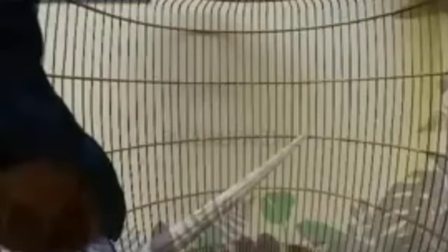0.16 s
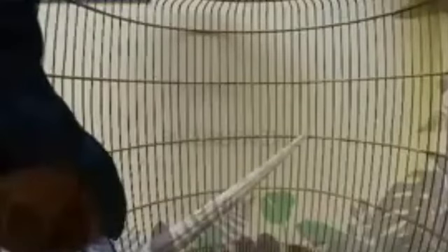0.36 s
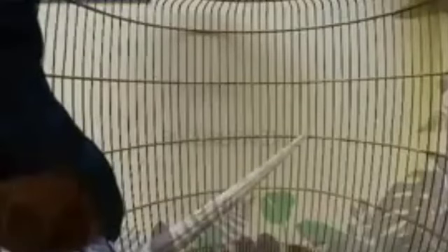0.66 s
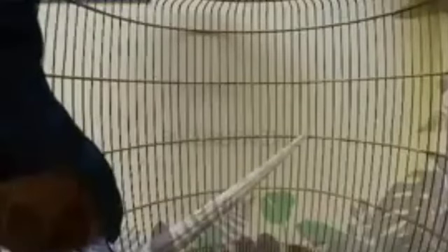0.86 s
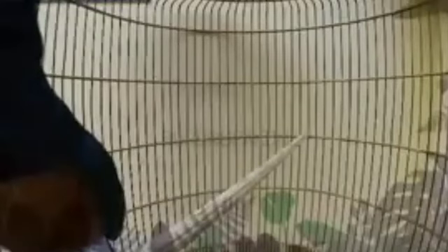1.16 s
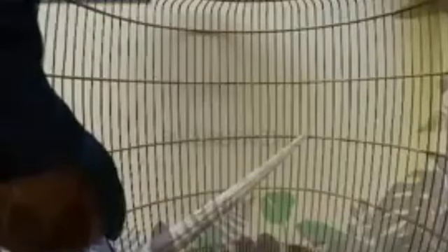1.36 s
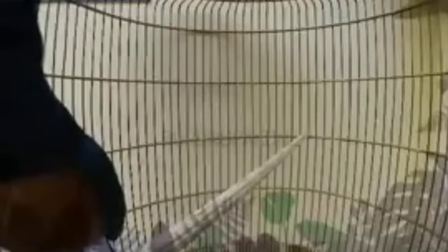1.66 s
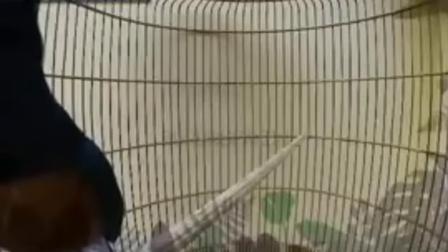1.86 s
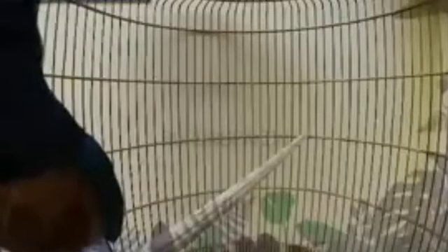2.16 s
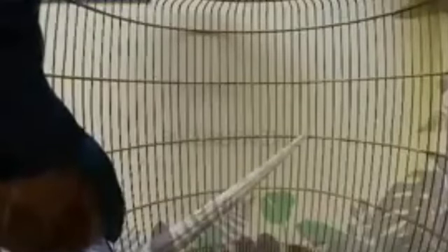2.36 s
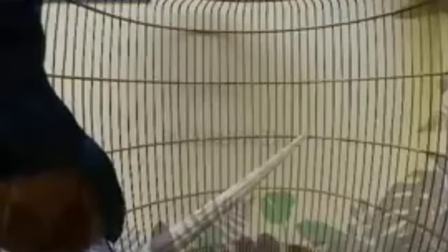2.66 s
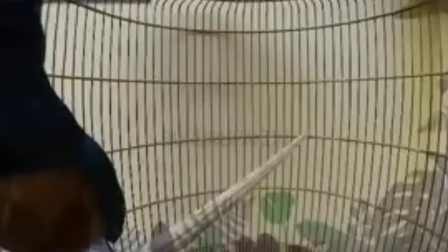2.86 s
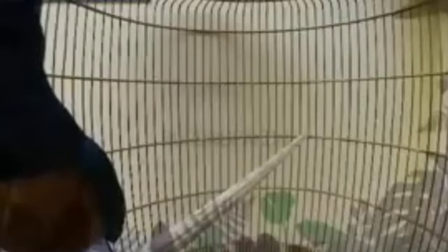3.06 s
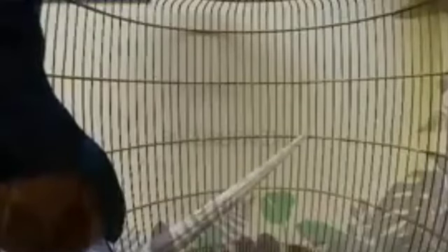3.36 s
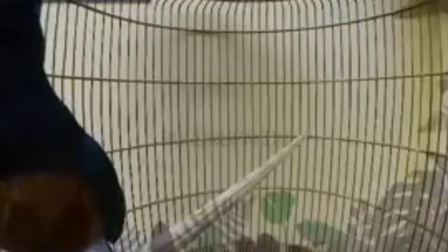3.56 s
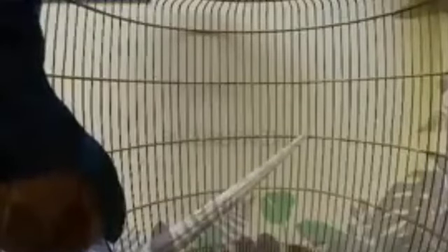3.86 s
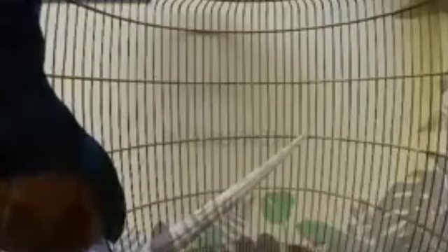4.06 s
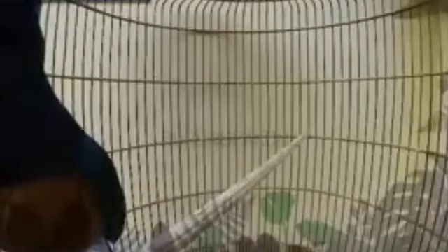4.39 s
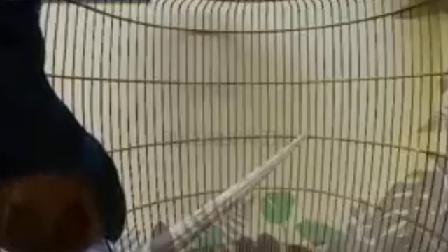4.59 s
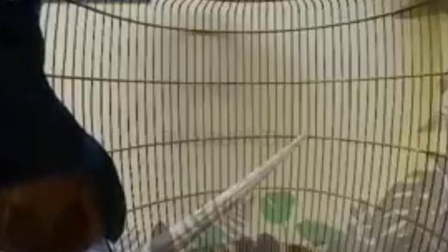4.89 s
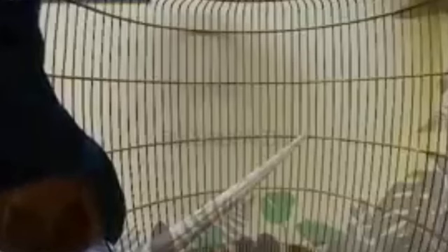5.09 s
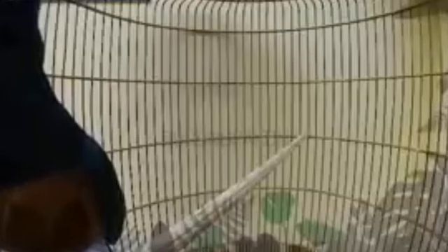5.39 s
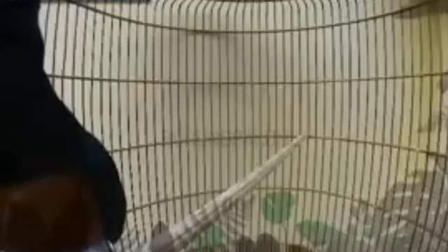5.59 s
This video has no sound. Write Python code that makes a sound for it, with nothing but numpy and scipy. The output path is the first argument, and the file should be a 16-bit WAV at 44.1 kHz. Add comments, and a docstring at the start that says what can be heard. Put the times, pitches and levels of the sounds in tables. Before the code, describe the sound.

A caged songbird sings loudly, close to the microphone, with short room reflections and slight overload on the strongest notes. At about 0.2 s comes a harsh, noisy churr of quick puffs, and at 0.45 s a much weaker one. From 0.7 to 1.2 s a piercing whistle falls rapidly from high pitch, settles, and breaks into a throbbing, raspy flutter, with a lower second voice colouring it. A similar whistle runs from 1.85 to 2.35 s. A quiet gap holds faint insects, hiss and a soft distant whistle near 2.6-3.1 s. Then eight sharp, plunging chips strike at about 3.2, 3.5, 3.85, 4.25, 4.5, 4.9, 5.3 and 5.65 s. All but the one at 4.25 are followed by a smooth, nearly pure whistle sweeping upward and drooping slightly at its end; the last is strongest. Tiny low pips surround some chips, and far birds churr and call faintly.

```python
"""Two harsh churrs, two long falling two-voiced whistles that break into a throb, then eight sharp chips,
most followed by a rising whistle: a caged songbird close to the microphone. Other birds and insects are faint.
Churrs are puffs of filtered noise; whistles and chips are gliding sines with weak partials, and the
coupled voices add sum and difference tones. A short room follows; the loudest notes overload the recorder."""
import sys
import numpy as np
from scipy import signal
from scipy.io import wavfile
from scipy.ndimage import uniform_filter1d

SR = 44100
rng = np.random.default_rng(int(sys.argv[2]) if len(sys.argv) > 2 else 0)


def bounce(signal):
    """Save signal as a 16-bit WAV file at the path given by the first command-line argument."""
    frames = np.transpose(np.atleast_2d(signal))
    limited = np.clip(frames, -1, 1)
    pcm = np.round(limited * 32767).astype(np.int16)
    wavfile.write(sys.argv[1], SR, pcm)


N = 252693
TIME = np.arange(N) / SR

# spectrum of the churring throat, near and far: freq_hz, relative density_db (per Hz)
CHURR_SPECTRUM = [(470, -68), (800, -45.5), (1310, -22.5), (1640, -10.5), (3290, -7.5), (4370, -12),
                  (5470, 0), (10000, -35), (14400, -34), (15500, -36.5)]
# long whistles: start_s, end_s, opening_hz, settled_hz (before the throb lifts it), slow_fall_hz,
# slow_fall_ms (time constant), slip_s, first_throb_s, throb_gap_ms, gap_growth_ms (times throb number squared)
LONG_WHISTLES = [(.701, 1.217, 5780, 4125, 1060, 57, .957, .8632, 18.0, .06),
                 (1.851, 2.352, 5460, 4085, 450, 145, 1.974, 1.979, 19.0, .075)]


def amp(db):
    """Decibels to amplitude: 20 dB is a factor of ten."""
    return 10 ** (np.asarray(db) / 20)


def rms_one(x):
    """Normalise the root mean square to 1."""
    return x / np.sqrt(np.mean(x ** 2) + 1e-20)


def phase(hz):
    """Phase is the running integral of frequency."""
    return 2 * np.pi * np.cumsum(hz) / SR


def wander(rate_hz):
    """Random modulation: white noise low-passed at rate_hz, with spread 1."""
    low_pass = signal.butter(2, rate_hz, fs=SR, output="sos")
    return rms_one(signal.sosfilt(low_pass, rng.standard_normal(N)))


def coloured(x, spectrum):
    """Linear filtering: a short minimum-phase response of unit energy gives noise its spectrum."""
    hz, db = np.transpose(spectrum)
    grid = np.linspace(0, SR / 2, 513)
    # doubled decibels, because the minimum-phase design takes the square root of the gain
    gains = amp(2 * np.interp(np.log(grid + 1), np.log(hz), db))
    taps = signal.minimum_phase(signal.firwin2(511, grid, gains + 1e-7, fs=SR))
    return signal.fftconvolve(x, rms_one(taps) / np.sqrt(len(taps)))[:N]


def played(notes, edge_s=.003):
    """Interpolate the columns of all notes over time, with a gate that opens softly inside each note."""
    s, *columns = np.transpose(np.vstack(notes))
    gate = sum(np.clip(np.minimum(TIME - note[0][0], note[-1][0] - TIME) / edge_s, 0, 1) for note in notes)
    return [np.interp(TIME, s, column) for column in columns] + [gate]


def glides(table, octave_db, twelfth_db, waver_db):
    """Linear frequency glides: soft-edged three-partial tones whose level wavers."""
    out = np.zeros(N)
    for start, end, from_hz, to_hz, db in table:
        at = slice(round(start * SR), round(end * SR))
        turn = phase(np.linspace(from_hz, to_hz, at.stop - at.start))
        tone = np.sin(turn) + amp(octave_db) * np.sin(2 * turn) + amp(twelfth_db) * np.sin(3 * turn)
        out[at] += amp(db) * np.sqrt(np.hanning(len(turn))) * tone
    return out * amp(waver_db * wander(60))


def garden():
    """Stationary noise: insect bands and outdoor hiss, filtered from white noise, with a drifting level."""
    # insects and hiss: freq_hz, relative density_db (per Hz)
    spectrum = [(410, -65), (700, -38), (1110, -32.5), (1300, -12), (1430, -20), (1570, -8), (1930, -13.5),
                (2600, -2.5), (3510, -17.5), (5770, -22), (6550, -0.5), (8940, -16), (11000, -19.5),
                (14300, -46), (22000, -120)]
    # mean level: time_s, level_db
    level = [(0, -64), (2.55, -66.5), (2.8, -60), (3.151, -67.5), (4.099, -65), (5.73, -63.5)]
    s, db = np.transpose(level)
    drifting_db = np.interp(TIME, s, db) + wander(1.8)
    return amp(drifting_db) * coloured(rng.standard_normal(N), spectrum)


def churrs():
    """Pulsed turbulence: puffs of air through the throat; later ones are weaker, longer and run together."""
    # churrs: first_puff_s, puff_gap_ms, first_puff_db (decay level before the rounded onset)
    churr_table = [(.1826, 6.6, 0.5), (0.4565, 7.7, -15)]
    second_db, loss_per_puff_db = 6, 5
    t60_ms, lengthens_ms = 12, 8       # decay of the first two puffs; each later one adds this
    envelope = np.zeros(N)
    for first, gap_ms, first_db in churr_table:
        for k in np.arange(8):
            late = np.maximum((TIME - first) * 1000 - k * gap_ms, 0)
            db = second_db - loss_per_puff_db * (k - 1) if k else first_db
            decay_db = 60 * late / (t60_ms + lengthens_ms * max(k - 1, 0))
            onset = (1 - np.exp(-late / 0.82)) ** 2
            envelope += amp(db - decay_db) * onset
    return coloured(envelope * rng.standard_normal(N), CHURR_SPECTRUM)


def room(x):
    """Reverberation: quick reflections off cage and wall, then a thin tail, both dulled."""
    near_t60_s, near_db = .05, -19.5   # levels before the treble cut
    tail_t60_s, tail_db = 0.37, -33
    t = TIME[:SR]
    near = amp(near_db) * rms_one(rng.standard_normal(SR) * amp(-60 * t / near_t60_s))
    tail = amp(tail_db) * rms_one(rng.standard_normal(SR) * amp(-60 * t / tail_t60_s))
    dull = signal.butter(2, 7500, fs=SR, output="sos")
    return signal.fftconvolve(x, signal.sosfilt(dull, near + tail) / np.sqrt(SR))[:N]


def lower_voice():
    """Frequency locking: it crests, sinks, locks to half the upper pitch, then frays upward into a rasp."""
    # lower voice: start_s, from_hz, crest_s, crest_hz, rest_hz, free_db (just before locking), lock_s,
    # locked_db, fray_s, frayed_hz (at the end), rasp_db, end_s
    lower_table = [(.68, 1977, 0.71, 2432, 1927, -32.5, .998, -29.5, 1.05, 2700, -43.5, 1.2),
                   (1.838, 2120, 1.863, 2395, 2072, -24, 1.995, -20, 2.09, 2950, -38, 2.27)]
    fall_ms, swell_ms, swelled_db, lock_ms, fray_ms = 60, 30, -22.5, 12, 110
    steady_hz, shaky_hz, frayed_scatter_hz = 8.2, 40, 232  # scatter: at first; added up to lock; added by fray
    notes = []
    for (start, from_hz, crest, crest_hz, rest_hz, free_db, lock,
         locked_db, fray, frayed_hz, rasp_db, end) in lower_table:
        s = np.arange(start, end, 1 / 1000)
        locked = np.clip((s - lock) * 1000 / lock_ms + 1, 0, 1)
        frayed = np.clip((s - fray) * 1000 / fray_ms, 0, 1)
        climb_hz = crest_hz - (crest_hz - from_hz) * ((crest - s) / (crest - start)) ** 2
        sink_hz = rest_hz + (crest_hz - rest_hz) * np.exp(-np.maximum(s - crest, 0) * 1000 / fall_ms)
        sink_hz += (frayed_hz - sink_hz) * np.maximum(s - fray, 0) / (end - fray)
        hz = np.where(s < crest, climb_hz, sink_hz)
        db = np.interp(s, [start, crest, crest + swell_ms / 1000, lock - lock_ms / 1000,
                           lock, fray, fray + fray_ms / 1000, end],
                       [-50, swelled_db - 9.5, swelled_db, free_db,
                        locked_db, locked_db - 7.5, rasp_db, -53])
        scatter_hz = steady_hz + shaky_hz * (1 - locked) * ((s - start) / (lock - start)) ** 3
        scatter_hz += frayed_scatter_hz * frayed ** 1.4
        notes.append(np.transpose([s, hz, db, scatter_hz, locked * (1 - frayed)]))
    return played(notes)


def upper_voice():
    """Exponential relaxation: the whistle swells as its pitch drops fast, then slowly; it ends in a flick down."""
    quick_fall_ms = 12
    slip_hz, slip_ms = 105, 7          # a downward slip shortly before the voices lock
    throb_lift_hz = 60.55              # between throbs the pitch rides this much higher
    lead_ms, swell_db, swell_ms = 14, 22, 21
    hold_db, hold_gain_db, hold_gain_ms = -4.2, 3.6, 300
    close_ms, close_db, close_hz = 10, 34, 500
    notes = []
    for start, end, open_hz, settled_hz, slow_hz, slow_ms, slip_s, first_throb, *_ in LONG_WHISTLES:
        s = np.arange(start - lead_ms / 1000, end + close_ms / 1000, 1 / 1000)
        late = np.maximum(s - start, 0) * 1000
        closing = np.maximum(s - end, 0) * 1000 / close_ms
        slip = slip_hz / (1 + np.exp((s - slip_s) * 1000 / slip_ms))
        quick_hz = open_hz - settled_hz - slow_hz - slip_hz
        hz = settled_hz + slip + slow_hz * np.exp(-late / slow_ms)
        hz += quick_hz * np.exp(-late / quick_fall_ms) - close_hz * closing
        hz += throb_lift_hz * np.clip((s - first_throb) * 100 + 1, 0, 1)
        db = hold_db + hold_gain_db * np.minimum(late / hold_gain_ms, 1) - swell_db * np.exp(-late / swell_ms)
        db -= 31 * np.maximum(start - s, 0) * 1000 / lead_ms + close_db * closing
        notes.append(np.transpose([s, hz, db]))
    return played(notes)


def throbs():
    """Joint amplitude and frequency modulation: a slowing beat of dips (dB) and sags (Hz), some deep."""
    # throbs where the air flow falters deeply: time_s, depth_db, width_ms (about half depth)
    falters = [(.9512, 11, 2.4), (.992, 10.5, 2.5), (1.011, 7, 1.9), (1.0506, 5.5, 4.8), (1.0879, 17, 6),
               (1.1087, 13, 5.5), (1.1268, 14.5, 4.9), (1.1471, 7, 7.2), (1.1653, 18, 5.5),
               (2.0953, 8.5, 4.5), (2.1304, 3, 9.5), (2.1531, 12.5, 5.7), (2.1767, 5.5, 4.8),
               (2.2419, 9, 5.4), (2.258, 7.5, 3.6), (2.2819, 14, 6.5), (2.3018, 19.5, 5.5),
               (2.3237, 15.5, 6.4), (2.346, 5, 20)]
    light_db, deepens_db_per_s, spread_db, light_ms, light_sag_hz = 2.5, 6.5, 0.58, 8.4, 90
    dips = [(*row, 0) for row in falters]
    beat = np.arange(19)
    for *_, first, gap_ms, growth_ms in LONG_WHISTLES:
        for s in first + (gap_ms * beat + growth_ms * beat ** 2) / 1000:
            depth_db = light_db + deepens_db_per_s * (s - first) + spread_db * rng.standard_normal()
            dips.append((s, depth_db, light_ms, light_sag_hz))
    dip_db, sag_hz = np.zeros(N), np.zeros(N)
    for s, depth_db, width_ms, base_hz in dips:
        at = slice(round((s - .05) * SR), round((s + .05) * SR))
        late = (TIME[at] - s) * 1000
        dip_db[at] += depth_db * np.exp(-(late / (0.65 * width_ms)) ** 2)
        sag_ms = np.where(late < 0, 11.0, 3.0)     # slow fall, quick return
        sag_hz[at] += (base_hz + 4 * depth_db) * np.exp(-(late / sag_ms) ** 2)
    return dip_db, sag_hz


def long_whistles():
    """Coupled oscillators: two voices make sum and difference tones; a falter drops level and pitch together."""
    # tones of the coupled voices: upper_multiple, lower_multiple, level_db (over the lower voice, at full flow)
    coupled_tones = [(0, 1, 2.5), (0, 2, 1.5), (0, 3, -4.5), (1, -1, -.5), (1, 1, -4), (2, 1, -20)]
    throat_floor_hz = 1770             # the tones below the upper voice are silent under this difference
    upper_hz, upper_db, upper_on = upper_voice()
    lower_hz, lower_db, scatter_hz, lock, lower_on = lower_voice()
    falter_db, sag_hz = throbs()
    upper_hz = upper_hz - sag_hz + 9 * wander(250)
    upper = phase(upper_hz)
    lower = phase(lock * upper_hz / 2 + (1 - lock) * lower_hz + np.abs(scatter_hz) * wander(180))
    flow = np.sqrt(2) * amp(upper_db - falter_db + .5 * wander(210)) * upper_on
    out = flow * (np.sin(upper) + amp(-28.5) * np.cos(2 * upper))
    for up, low, db in coupled_tones:
        tone = np.sqrt(2) * amp(lower_db + db) * lower_on * np.sin(up * upper + low * lower)
        if up:
            tone *= np.minimum(flow, 1) ** 2       # coupling needs the upper voice
        if low < 0:
            tone *= np.clip((upper_hz - lower_hz - throat_floor_hz) / 350, 0, 1)
        # once locked, the other tones merge with those of multiple 1
        out += tone if low == 1 else (1 - lock) * tone
    return out


def far_birds():
    """Narrow and wide bands at low level: distant noise churrs, a wavering two-partial whistle, single notes."""
    # churrs of a far bird: start_s, end_s, level_db, fade_db (lost by the end)
    far_churrs = [(1.357, 1.555, -53.5, 12.5), (4.07, 4.224, -57, -0.5), (4.758, 4.861, -50.5, 4),
                  (5.219, 5.245, -48.5, 5.5)]
    # far whistler: time_s, pitch_hz, level_db, octave_db
    far_whistle = [(2.62, 1840, -62, -64), (2.66, 2113, -75, -54), (2.7, 2205, -62, -51),
                   (2.87, 2220, -58.5, -58), (2.95, 2182, -55.5, -67.5), (3.06, 2066, -60.5, -73),
                   (3.13, 2033, -72, -80)]
    # far single notes: start_s, end_s, from_hz, to_hz, level_db
    far_notes = [(2.25, 2.45, 1600, 1690, -63), (2.36, 2.51, 1350, 1346, -65.5),
                 (3.9, 4.5, 1905, 1880, -73), (4.8, 4.92, 2150, 2056, -59.5),
                 (4.95, 5.27, 1958, 1727, -59.5), (5.03, 5.27, 1400, 1467, -69)]
    db, on = played([[(start, db), (end, db - fade_db)] for start, end, db, fade_db in far_churrs])
    out = coloured(on * amp(db) * rng.standard_normal(N), CHURR_SPECTRUM)
    hz, db, octave_db, on = played([far_whistle])
    turn = phase(hz + 12 * wander(56.4))
    fundamental = amp(db + 3.8 * wander(52)) * np.sin(turn)
    octave = amp(octave_db + 3.8 * wander(67)) * np.sin(2 * turn)
    out += on * np.sqrt(2) * (fundamental + octave)
    return out + glides(far_notes, octave_db=-28.5, twelfth_db=-40.0, waver_db=3.5)


def chips():
    """Falling tone with a resonant octave: a soft lead-in swells, the pitch plunges and the level dies away."""
    # chips: loud_end_s, loud_ms, lead_in_db, lead_in_ms, break_db (over the lead-in), tail_floor_hz, tail_ms
    chip_table = [(3.196, 11.9, -46, 10.3, -5, 2200, 19), (3.505, 13.3, -18, 9.8, -6.5, 2304, 34),
                  (3.8502, 11.7, -29.5, 9.4, -24.5, 2216, 43.6), (4.2469, 10.9, -27, 8.3, 15, 2665, 28.8),
                  (4.5051, 15.8, -27, 12.6, 12.5, 2604, 28), (4.922, 12.9, -29, 11, 7.5, 2440, 33),
                  (5.3044, 12, -24, 11.8, 8, 2288, 53), (5.6443, 16.5, -24.5, 14.4, 10.5, 2020, 29)]
    # pitch: time_ms (from the end of the loud part; before it, stretched with chip length), pitch_hz
    chip_fall = [(-34, 5800), (-20, 6150), (-9, 5805), (-7.5, 5750), (-3.5, 5300), (1.3, 4100), (6, 3200),
                 (12.5, 2600), (21, 2000)]
    tail_db = -31
    out = np.zeros(N)
    ms, fall_hz = np.transpose(chip_fall)
    shake = wander(380)
    air_band = signal.butter(1, [2500, 7500], "band", fs=SR, output="sos")
    air = rms_one(signal.sosfilt(air_band, rng.standard_normal(N)))
    for s, loud_ms, lead_db, lead_ms, break_db, end_hz, tail_ms in chip_table:
        at = slice(round((s - .05) * SR), round((s + 0.058) * SR))
        late = (TIME[at] - s) * 1000
        swell = -loud_ms - 4
        db = np.interp(late, [swell - lead_ms - 3.5, swell - lead_ms, swell - 3, swell, -loud_ms,
                              -.6 * loud_ms, -.7, 1.5, 8, tail_ms, tail_ms + 3],
                       [-75, lead_db, lead_db - 1.5, lead_db + break_db, -11,
                        1.5, 3.5, -19, tail_db, tail_db - 3, -70])
        pace = np.where(late < 0, (loud_ms / 14) ** 0.24, 1)      # a longer chip falls more slowly
        hz = np.maximum(np.interp(late / pace, ms, fall_hz), end_hz)
        # shaky while it drops, steadier once it settles
        rough = shake[at] * np.clip(late / 3, .1, 1) * np.where(hz > end_hz, 1, .35)
        turn = phase(hz + 180 * rough)
        throat_db = -6 - 21 * np.log2(2 * hz / 5000) ** 2         # octave favoured near the throat's resonance
        flutter_db = 3.5 * rough
        out[at] += amp(db + flutter_db) * (np.sin(turn) + amp(throat_db) * np.sin(2 * turn))
        # rushing air, strongest as the tone breaks off
        air_db = -33.5 - np.abs(late) * np.where(late < 0, 1.2, .6)
        out[at] += amp(air_db) * air[at]
    return out


def pips():
    """Brief harmonic glides: the lower voice stirs before or after a chip."""
    # pips: start_s, end_s, from_hz, to_hz, level_db
    pip_table = [(3.166, 3.18, 1312, 1900, -43), (3.216, 3.231, 3450, 3327, -31.5),
                 (3.524, 3.541, 3500, 3480, -32), (3.818, 3.837, 1470, 1945, -51),
                 (4.466, 4.49, 1410, 2104, -46.5), (5.608, 5.632, 1480, 2480, -40)]
    return glides(pip_table, octave_db=-15, twelfth_db=-18, waver_db=3)


def rises():
    """Sigmoid frequency sweep: nearly pure whistles climb in an S and droop, with weak second and third partials."""
    # rising whistles: start_s, end_s, slowness (stretches the times below), top_hz (nominal), peak_db
    rise_table = [(3.227, 3.357, 0.83, 3177, -4.5), (3.541, 3.67, 0.89, 3136, -4),
                  (3.895, 4.018, 0.97, 3054, -3.5), (4.584, 4.708, 0.92, 3107, -2),
                  (4.955, 5.112, 0.98, 3080, -1.5), (5.336, 5.486, 0.98, 3051, -1.5),
                  (5.657, 5.822, 1.026, 3035, 6)]
    low_hz, soft_db = 2200, -33
    creep = .15                        # share of the climb that is a steady slope
    # times count back from the end: middle of the climb, its width; droop at the end (share of the climb)
    climb_at_ms, climb_ms, droop, droop_ms = 68.5, 15, 0.33, 6.1
    swell_from_ms, full_ms, fade_ms, fade_per_ms = 131, 38, 16.1, 0.02
    out, waver = np.zeros(N), wander(40)
    for start, end, slowness, top_hz, peak_db in rise_table:
        at = slice(round(start * SR), round(end * SR))
        left = (end - TIME[at]) * 1000 / slowness
        climb = (1 - creep) / (1 + np.exp((left - climb_at_ms) / climb_ms))
        climb += creep * np.minimum(1 - (left - full_ms) / swell_from_ms, 1)
        climb -= droop * np.exp(-left / droop_ms)
        swell = np.interp(left, [full_ms, swell_from_ms], [1, 0])
        swell -= fade_per_ms * np.maximum(fade_ms - left, 0)
        db = soft_db + (peak_db - soft_db) * uniform_filter1d(swell, size=600, mode="nearest")
        turn = phase(low_hz + (top_hz - low_hz) * climb + 30 * waver[at] * (1 - climb))
        on = np.clip(np.minimum(TIME[at] - start, end - TIME[at]) / .004, 0, 1)
        second = amp(0.15 * db - 43.0) * np.sin(2 * turn)
        third = amp(1.5 * db - 50.5) * np.sin(3 * turn)
        out[at] += on * (amp(db) * np.sin(turn) + second + third)
    return out


def scene():
    """Superposition: the singer with its room, and the background, alike in both channels."""
    bird = long_whistles() + chips() + rises() + pips() + churrs()
    return np.tile(bird + room(bird) + far_birds() + garden(), (2, 1))


def record(dry):
    """Saturation: after a bass cut, tops flatten, hiss and a bias shift follow the excess; the top is cut."""
    top, knee = .94, 37.0              # limiting amplitude; sharpness of the bend
    cutoff_hz = 15700
    x = signal.sosfilt(signal.butter(2, 900, "high", fs=SR, output="sos"), dry)
    fine = signal.resample_poly(x, 3, 1, axis=1)   # oversampled against aliasing
    limited = fine / (1 + np.abs(fine / top) ** knee) ** (1 / knee)
    flat = signal.resample_poly(limited, 1, 3, axis=1)
    excess = uniform_filter1d(np.abs(x - flat), size=60)
    # mostly common to both channels, with a little of opposite sign
    hiss = rng.standard_normal(N) + amp(-26.5) * rng.standard_normal(N) * [[1], [-1]]
    bias = signal.sosfilt(signal.butter(3, 110, fs=SR, output="sos"), excess)
    flat = flat + amp(-26.0) * excess * hiss + amp(-32.5) * bias
    return signal.sosfiltfilt(signal.cheby2(12, 50, cutoff_hz, fs=SR, output="sos"), flat)


dry = scene()
out = record(dry)
bounce(out)
```